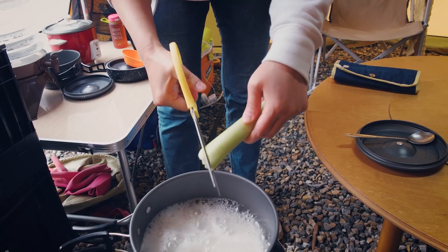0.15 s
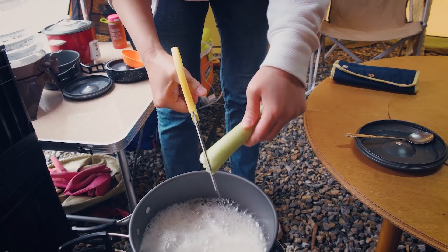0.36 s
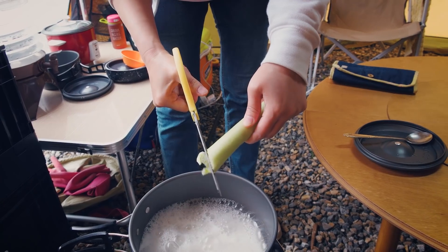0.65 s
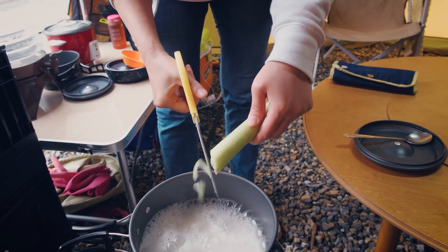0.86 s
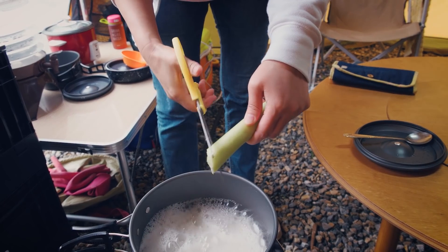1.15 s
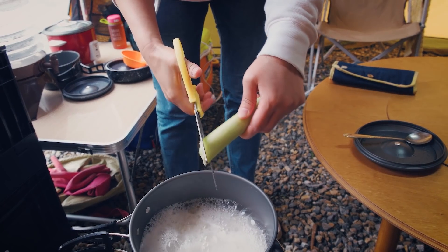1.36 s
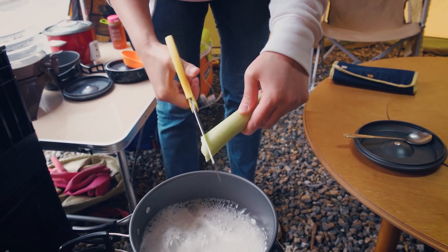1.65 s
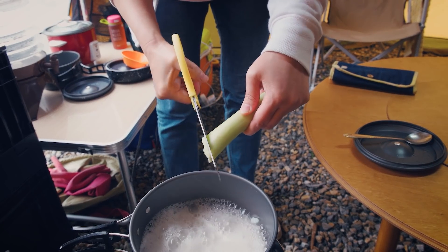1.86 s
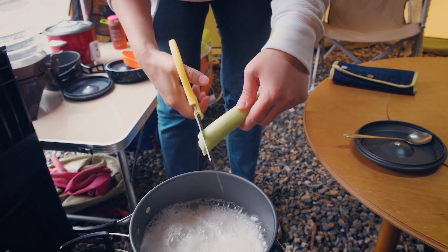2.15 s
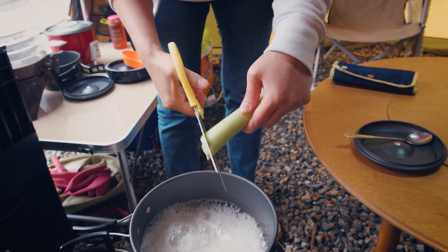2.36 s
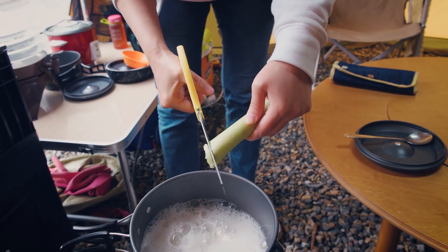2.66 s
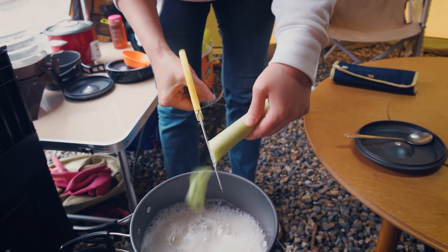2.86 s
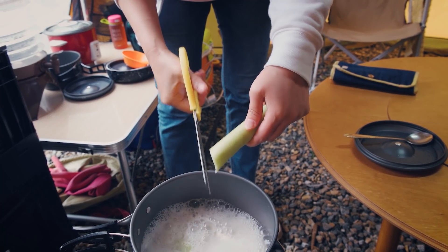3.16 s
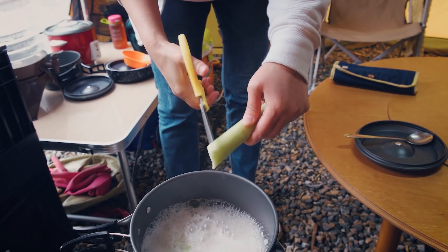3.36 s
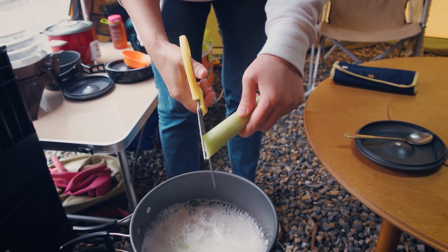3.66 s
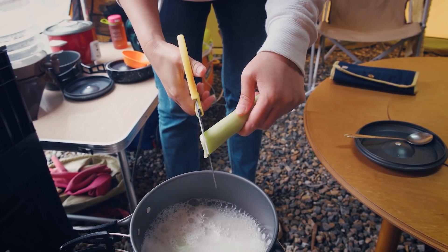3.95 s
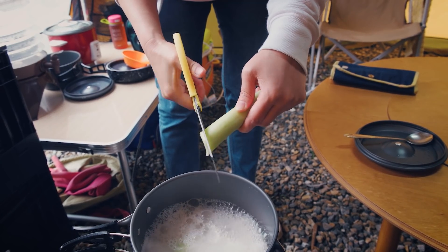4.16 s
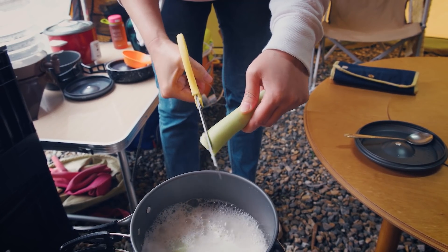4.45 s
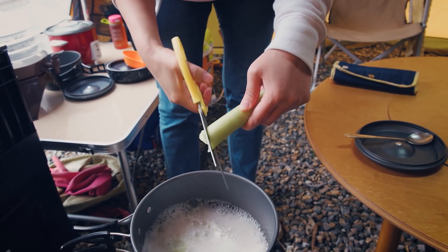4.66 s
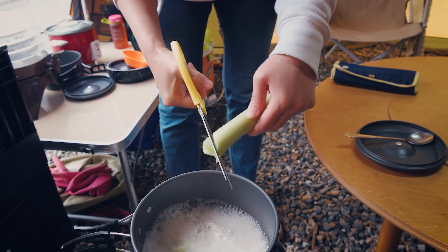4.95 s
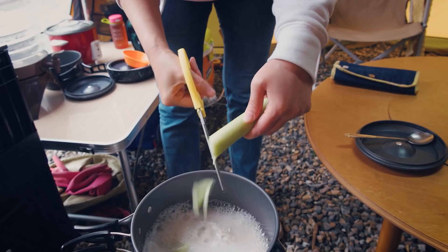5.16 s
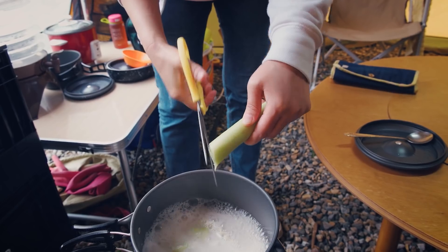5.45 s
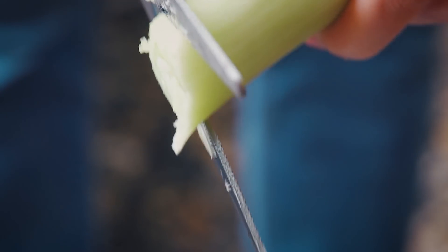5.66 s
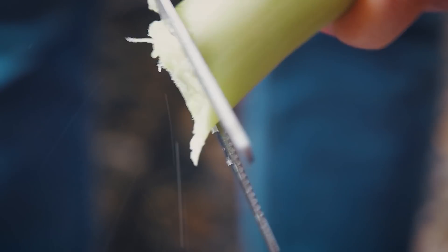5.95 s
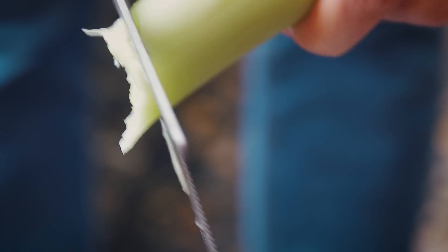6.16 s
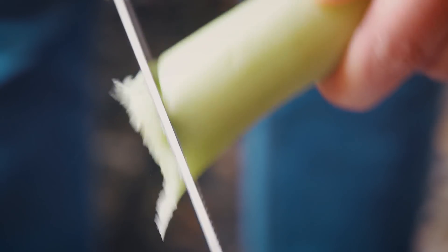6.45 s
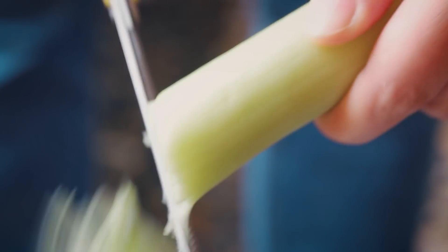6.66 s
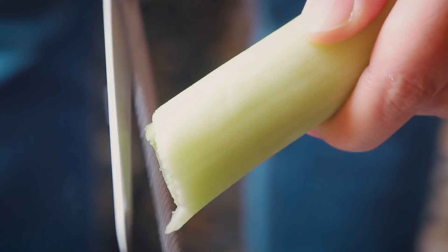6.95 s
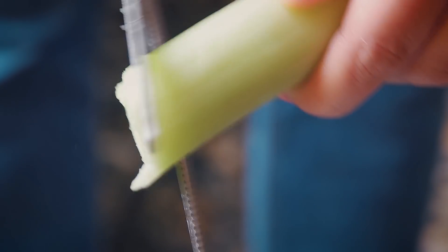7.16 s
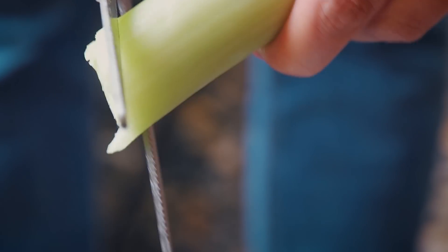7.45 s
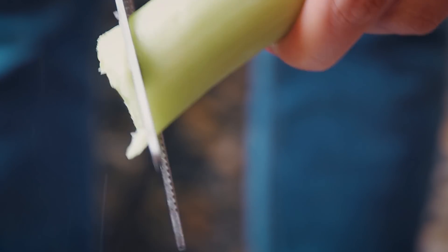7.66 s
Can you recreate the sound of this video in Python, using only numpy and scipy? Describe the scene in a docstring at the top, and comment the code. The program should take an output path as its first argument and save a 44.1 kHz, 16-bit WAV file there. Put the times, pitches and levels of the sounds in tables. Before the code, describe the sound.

Kitchen scissors crunch and clack through a thick green onion over a steadily roaring gas burner and a boiling pot.

```python
"""Snipping green onion into a boiling pot

Outdoors, a camping gas burner roars under a pot where bubbles pop and foam fizzes and spits.
Kitchen scissors crunch through a thick green onion: its layers snap and the steel blades clack.
Air bumps the microphone, and a thin whistle swells in the stove's hiss near the end.
The camera's gain control turns everything down briefly after the loudest clacks."""
import sys
import numpy as np
from scipy import signal
from scipy.fft import rfft, irfft, next_fast_len
from scipy.io import wavfile
from scipy.ndimage import minimum_filter1d, map_coordinates

SR = 44100
rng = np.random.default_rng(int(sys.argv[2]) if len(sys.argv) > 2 else 0)


def inscribe(sig):
    """Save sig as 16-bit PCM at rate SR to the path in sys.argv[1].

    A 1-D sig is mono; a 2-D sig holds one channel per row.
    Samples are clipped to [-1, 1] before scaling.
    """
    pcm = np.round(np.clip(np.atleast_2d(sig).T, -1, 1) * 32767)
    wavfile.write(sys.argv[1], SR, pcm.astype(np.int16))


N = 343539

# the flame's broad roar: (frequency [Hz], relative level [dB])
ROAR_SPECTRUM = [(22, -49), (45, -10.5), (65, -1), (100, 0.5), (185, 0.5), (240, -10), (520, -12.5),
                 (1000, -20.5), (3100, -17.5), (3500, -26.5), (5000, -31.5), (6300, -35), (8000, -35.5),
                 (11000, -42.5), (15500, -51.5)]
# pitches at which burner and pot ring: (frequency [Hz], width [Hz], relative level [dB])
STOVE_RESONANCES = [(360, 170, -7), (489, 141, -4), (731, 36, -6.5), (836.5, 108, -6.5), (1432, 206, -14.5),
                    (1596, 146, -6), (2077, 27, -6.5), (2163, 52, -4), (2504, 36, -7.5), (2805, 26, -10),
                    (3040, 102, -6), (3190, 120, -23), (3980, 220, -29), (4673, 90, -21.5),
                    (4920, 105, -20.5), (5280, 50, -20), (5580, 61, -24.5), (6010, 75, -29),
                    (7120, 71, -26), (7540, 84, -26), (8100, 250, -35.5), (8870, 250, -35),
                    (10470, 130, -37), (11930, 200, -35.5), (12700, 300, -45), (14150, 250, -42)]
# big bubbles bursting: (time [s], peak level [dB], pitch [Hz])
BUBBLE_POPS = [(.897, -12.5, 1400), (3.458, -8.5, 1570), (3.754, -4.5, 1460), (3.7579, -5, 1450),
               (3.7629, -5, 800), (4.52, -9, 1590), (5.209, -11, 1910), (6.252, -7.5, 1400),
               (7.188, -8, 710), (7.448, -5, 1530)]
# strokes of the blades through the onion: (start [s], end [s], level at full pressure [dB])
CUT_STROKES = [(0, 0.064, -24), (0.104, 0.185, -32.5), (0.508, .532, -24), (0.684, 0.766, -33),
               (1.68, 1.93, -35.5), (2.341, 2.51, -33.5), (2.652, 2.727, -33.5), (2.76, 2.95, -34.5),
               (4.21, 4.42, -33), (4.831, 5.064, -35), (5.78, 5.925, -31.5), (6.338, 6.708, -33),
               (6.455, 6.524, -30.5), (7.505, 7.612, -33), (7.59, 7.755, -26.5)]
# tone of tearing fibres, also used for the foam: (frequency [Hz], relative level [dB])
CRUNCH_SPECTRUM = [(400, -25), (1000, 1), (1600, 11), (2800, 8.5), (3800, 4), (6000, 0), (8500, -2.5),
                   (12000, -8), (15500, -11)]
# blades knocking together: (time [s], peak level [dB], pitch [Hz], grinding time [s])
BLADE_CLACKS = [(0.0219, 0.5, 1790, 0.0034), (0.1852, 0.5, 1810, 0.00052), (0.7541, -2.5, 1740, 0.0032),
                (1.754, -14.5, 2120, 0.0011), (1.767, -5, 1880, 0.00083), (1.911, 1, 1820, 0.0013),
                (1.9198, 1, 1720, 0.007), (2.408, -3.5, 1650, 0.0013), (2.414, -4.5, 1760, 0.0011),
                (2.4612, -4, 1700, 0.0014), (2.466, -9.5, 1680, 0.0072), (2.6654, -4.5, 1940, 0.0017),
                (2.911, -5.5, 1710, 0.015), (4.2567, -10, 1730, 0.0017), (4.3263, 2.5, 1790, .0016),
                (4.3483, 0, 2630, 0.00079), (4.3605, -2.5, 1860, 0.0026), (4.4126, 2, 1650, 0.00036),
                (4.4358, 0.5, 1700, 0.00079), (4.9172, -11, 1600, 0.00084), (4.9325, -5, 1620, 0.00069),
                (4.9554, -12, 2010, 0.0022), (5.1365, -8.5, 1650, 0.027), (5.86, -4, 2350, 0.0019),
                (5.9291, 0.5, 2350, 0.0058), (5.9844, 2.5, 2230, 0.0023), (6.6566, -8.5, 1650, 0.0048),
                (6.699, -9, 2480, 0.016), (7.529, -12.5, 1510, 0.0023), (7.6088, -1, 2660, 0.0021),
                (7.613, 3, 2354, 0.004), (7.669, -5.5, 2400, 0.0079)]
# steel rubbing on steel: (frequency [Hz], relative level [dB])
GRIT_SPECTRUM = [(250, -12), (500, -11.5), (950, -12), (1600, -5.5), (2750, 5.5), (3700, -2.5), (6000, -5),
                 (9000, -9.5), (13000, -14), (16000, -20.5)]
# ringing tones of the blades: (frequency [Hz], relative level [dB], time to fade by 60 dB [s])
BLADE_TONES = [(1415, -20.5, .08), (1728, -15.5, .05), (2120, -17, .04), (2770, -16, .055),
               (3300, -24, .025), (3950, -21, .022), (5800, -34, .03), (8250, -38, .035), (12520, -42, .03)]
# air pushing on the microphone: (middle time [s], half length [s], peak level [dB])
AIR_BUMPS = [(0.066, 0.042, -12.5), (.391, 0.024, -14), (.681, 0.025, -8.5), (1.381, .031, -21),
             (5.242, 0.029, -15), (5.491, 0.019, -15), (5.541, 0.012, -11.5)]
# droplets spitting from the foam: (time [s], level [dB])
DROPLET_SPITS = [(.44, -27), (1.073, -23), (1.568, -28), (2.2, -20.5), (5.3, -19)]


def amp(db):
    """Turn decibels into a gain."""
    return 10 ** (np.asarray(db) / 20)


def unit(x):
    """Scale a signal to an average (rms) level of 1."""
    return x / np.sqrt(np.mean(x ** 2) + 1e-20)


def along(points, hz):
    """Read between (frequency, value) points on a logarithmic frequency axis."""
    frequencies, values = np.transpose(points)
    return np.interp(np.log(hz + 1), np.log(frequencies + 1), values)


def filtered(x, response):
    """Scale each frequency in x by the gain that response gives for it."""
    size = next_fast_len(2 * len(x))
    hz = np.fft.rfftfreq(size, 1 / SR)
    return irfft(rfft(x, size) * response(hz), size)[:len(x)]


def coloured(x, spectrum):
    """Shape the tone of x with a spectrum table, at an average level of 1."""
    return unit(filtered(x, lambda hz: amp(along(spectrum, hz))))


def wobble(rate):
    """A smooth curve through `rate` random points a second."""
    points = rng.standard_normal(int(N * rate / SR) + 4)
    return map_coordinates(points, [np.arange(N) * rate / SR])


def grains(rate, spread_db):
    """Clicks of random size at random times, about `rate` a second."""
    clicks = (rng.random(N) < rate / SR) * rng.choice([-1, 1], N)
    return clicks * amp(spread_db * np.clip(rng.standard_normal(N), -2, 2))


def ring(t, hz, cycles):
    """A tone that fades to about a third in the given number of cycles."""
    return np.sin(2 * np.pi * hz * t) * np.exp(-t * hz / cycles)


def add(track, start_s, sound):
    """Mix a sound into the track at the given time."""
    part = track[max(round(start_s * SR), 0):][:len(sound)]
    part += sound[:len(part)]


def stove_colour(hz):
    """The stove's gain at each frequency: a broad roar plus the resonances of burner and pot."""
    power = amp(along(ROAR_SPECTRUM, hz)) ** 2
    for centre, width, db in STOVE_RESONANCES:
        power += amp(db) ** 2 / (1 + ((hz - centre) / (0.7 * width)) ** 2) ** 2
    return np.sqrt(power)


def burner(level_db=-24.5, flutter_db=0.82, sputter_db=-9):
    """A swirling flame flutters and sputters, ringing in the space under the pot."""
    flame = rng.standard_normal(N) * amp(flutter_db * wobble(rate=22))
    sputter = amp(sputter_db) * unit(grains(rate=150, spread_db=3.5))
    return amp(level_db) * unit(filtered(flame + sputter, stove_colour))


def boiling(simmer_db=-23, fizz_db=-55, pop_fade_s=0.00083, opening_s=0.00004, small_bubbles=70):
    """Big bubbles burst with dull pops, small ones burst at random, and the foam fizzes."""
    t = np.arange(SR // 25) / SR
    opening = 1 - np.exp(-t / opening_s)  # a wet film gives way softly
    water = np.zeros(N)
    for start, db, hz in BUBBLE_POPS:
        pop = opening * ring(t, hz, cycles=pop_fade_s * hz)
        add(water, start, amp(db) * pop / np.abs(pop).max())
    for when, size, pitch in rng.random((small_bubbles, 3)):
        pop = opening * ring(t, hz=600 * 3 ** pitch, cycles=1.4)
        add(water, when * N / SR, amp(simmer_db + 4.2 * size) * pop)
    fizz = coloured(grains(rate=300, spread_db=10), CRUNCH_SPECTRUM)
    return water + amp(fizz_db) * fizz


def onion_crunch(scrape_db=-7, tick_s=0.00089, build_share=0.31, release_s=0.014):
    """Each stroke presses until fibres break in dense ticks, while the blades scrape each other."""
    t = np.arange(N) / SR
    pressure = np.zeros(N)
    for start, end, db in CUT_STROKES:
        build = np.clip((t - start) / (build_share * (end - start)), 0, 1)
        release = np.exp(-np.maximum(t - end, 0) / release_s)
        pressure += amp(db) * build * release
    tick_fade = np.exp(-t[:SR // 200] / tick_s)
    breaks = np.convolve(np.abs(grains(rate=380, spread_db=6)), tick_fade)[:N]
    fibres = unit(breaks * rng.standard_normal(N))
    scrape = amp(scrape_db) * rng.standard_normal(N)
    return pressure * coloured(fibres + scrape, CRUNCH_SPECTRUM)


def blade_hit(peak_db, hz, grind_s, swell_share=0.28, rattle_db=-13, rattle_s=0.01,
              knock_db=-1, chatter_db=-14.5, steel_db=-5,
              grit_db=-14, grit_rise_s=0.0002, echo_db=-32, echo_s=0.024):
    """A knock muffled by hand and onion, with grinding edges, ringing steel and a faint echo."""
    t = np.arange(SR // 12) / SR
    knock = amp(knock_db) * ring(t, hz, cycles=1.26)
    swell = np.exp(-((t / grind_s - swell_share) / (1 - swell_share)) ** 2)
    grinding = swell + amp(rattle_db) * np.exp(-t / rattle_s)
    # chattering edges keep the knock's pitch ringing
    resonance = ring(t[:SR // 100], hz, cycles=2)
    chatter = np.convolve(grinding * rng.standard_normal(len(t)), resonance)[:len(t)]
    chatter *= amp(chatter_db) * np.linalg.norm(grinding) / np.linalg.norm(chatter)
    # bright grit sets in as the edges start to slide
    onset = 1 - np.exp(-t / grit_rise_s)
    echo = amp(echo_db) * np.exp(-t / echo_s)
    grit_noise = coloured(rng.standard_normal(len(t)), GRIT_SPECTRUM)
    grit = onset * (amp(grit_db) * grinding + echo) * grit_noise
    # the crossing point moves along the blades, so each hit rings them a little differently
    steel = np.zeros(len(t))
    for tone_hz, db, fade_s in BLADE_TONES:
        fade = amp(db + rng.normal(0, 3.4) - 60 * t / fade_s)
        detuned_hz = tone_hz * rng.normal(1, 0.0034)
        steel += fade * np.sin(2 * np.pi * detuned_hz * t + rng.uniform(0, 2 * np.pi))
    hit = knock + chatter + grit + amp(steel_db) * steel
    return amp(peak_db) * hit / np.abs(hit).max()


def blade_clacks():
    """The blades knock together as they break through, close and open again."""
    blades = np.zeros(N)
    for start, db, hz, grind_s in BLADE_CLACKS:
        add(blades, start, blade_hit(db, hz, grind_s))
    return blades


def layer_snaps(peak_db=-16, scatter_db=6, pitch_hz=2210, pitch_scatter=0.12, gap_s=0.033):
    """The onion's layers give way one after another and jolt the blades."""
    layers = np.zeros(N)
    for start, end, _ in CUT_STROKES:
        chance = rng.uniform(-1.2, 1, size=(12, 3))
        for when, (shift, size, pitch) in zip(np.arange(start + gap_s, end, gap_s), chance):
            hz = pitch_hz * np.exp(pitch_scatter * pitch)
            snap = blade_hit(peak_db + scatter_db * size, hz, grind_s=0.00065)
            add(layers, when + shift * gap_s / 2, snap)
    return layers


def air_bumps(pitch_hz=71, wander_radians=0.91):
    """Soft pushes of air on the microphone set off a few low, uneven swings."""
    t = np.arange(N) / SR
    drift = wander_radians * wobble(rate=50)
    bumps = np.zeros(N)
    for middle, half_length, db in AIR_BUMPS:
        push = amp(db) * np.exp(-((t - middle) / half_length) ** 2)
        bumps += push * np.cos(2 * np.pi * pitch_hz * (t - middle) + drift)
    return bumps


def droplet_spits(pitch_hz=10000):
    """Droplets spit from the foam with tiny bright ticks at scattered pitches."""
    t = np.arange(SR // 100) / SR
    drops = np.zeros(N)
    for start, db in DROPLET_SPITS:
        add(drops, start, amp(db) * ring(t, pitch_hz * rng.uniform(0.75, 1.5), cycles=0.82))
    return drops


def stove_whistle(level_db=-48, pitch_hz=5080, half_width_hz=170, loudest_s=7.3, swell_s=0.78):
    """A narrow band of the stove's hiss slowly swells and eases."""
    t = np.arange(N) / SR
    swell = np.exp(-((t - loudest_s) / swell_s) ** 2)
    band = filtered(rng.standard_normal(N), lambda hz: 1 / (1 + ((hz - pitch_hz) / half_width_hz) ** 2))
    return amp(level_db) * swell * unit(band)


def scene():
    """Stove, pot and scissors, all close to one microphone."""
    cooking = burner() + stove_whistle() + boiling() + droplet_spits()
    return (cooking + onion_crunch() + air_bumps() + blade_clacks() + layer_snaps())[None]


def gain_control(x, threshold_db=-5, hold_s=0.05, release_db_per_s=38, attack_s=0.0043):
    """Peaks over the threshold pull the volume down; it stays there a moment, then creeps back."""
    excess_db = np.maximum(20 * np.log10(np.abs(x) + 1e-9) - threshold_db, 0)
    hold_samples = 2 * int(hold_s * SR / 2) + 1
    held_db = -minimum_filter1d(-excess_db, hold_samples, origin=hold_samples // 2, mode="constant")
    ramp_db = release_db_per_s * np.arange(N) / SR
    cut_db = np.maximum.accumulate(held_db + ramp_db) - ramp_db  # each cut shrinks at a steady rate
    smoothing = np.exp(-1 / (attack_s * SR))
    smooth_cut_db = signal.lfilter([1 - smoothing], [1, -smoothing], cut_db)
    return x * amp(-smooth_cut_db)


def record(dry, top_hz=15850):
    """The camera turns loud moments down, flattens peaks at full scale and drops the highest treble."""
    limited = np.clip(gain_control(dry[0]), -1, 1)
    return filtered(limited, lambda hz: hz < top_hz)[None]


dry = scene()
out = record(dry)
inscribe(out)
```